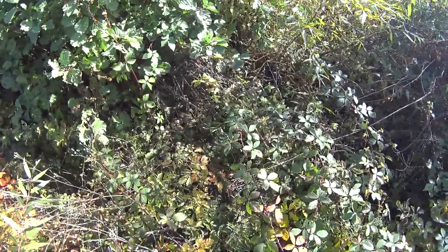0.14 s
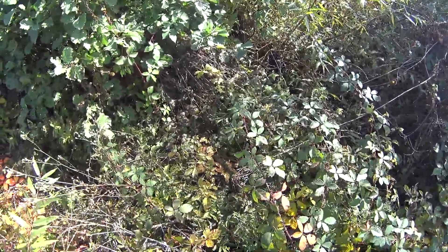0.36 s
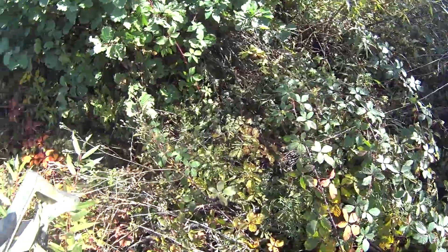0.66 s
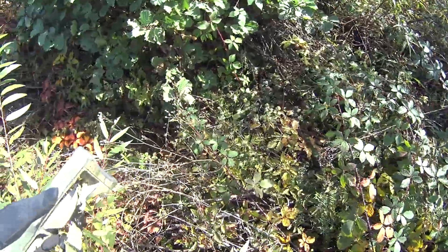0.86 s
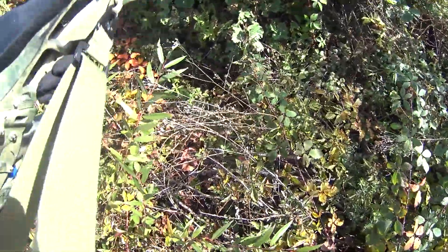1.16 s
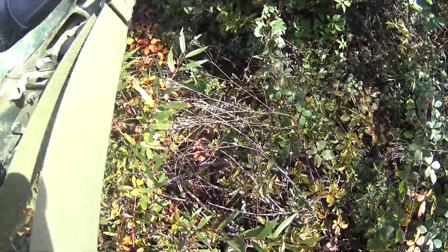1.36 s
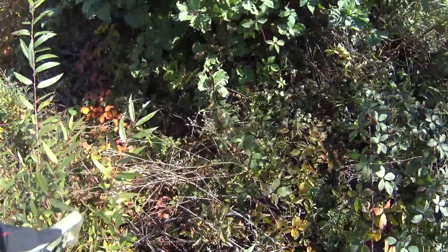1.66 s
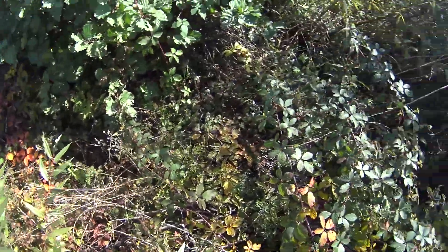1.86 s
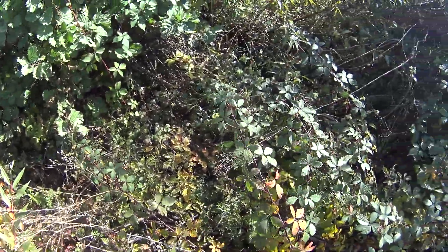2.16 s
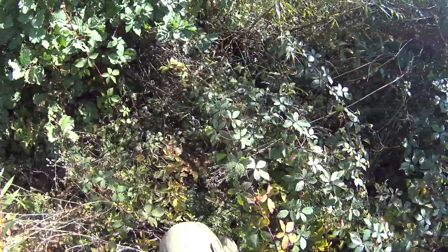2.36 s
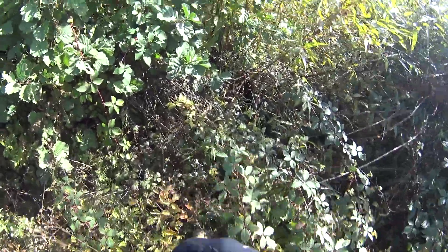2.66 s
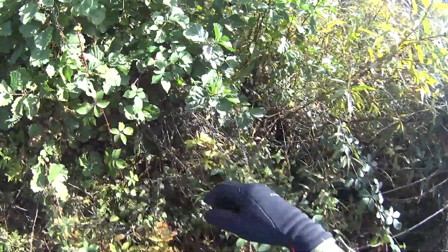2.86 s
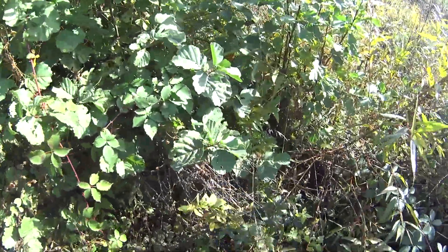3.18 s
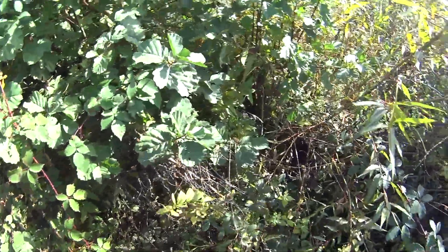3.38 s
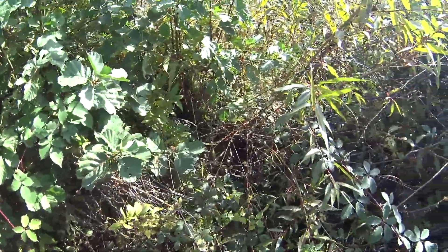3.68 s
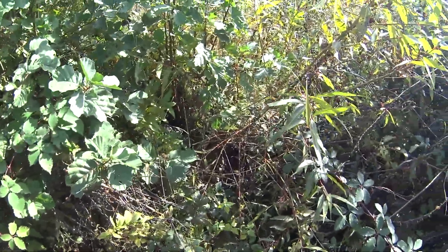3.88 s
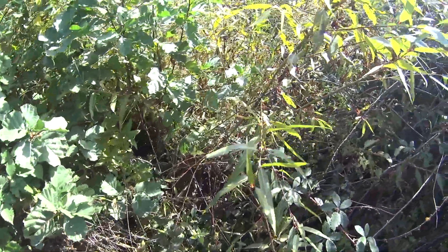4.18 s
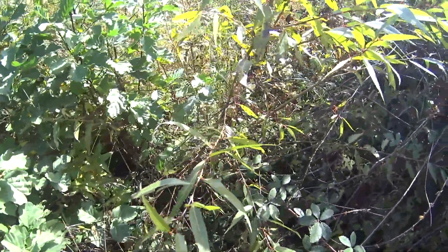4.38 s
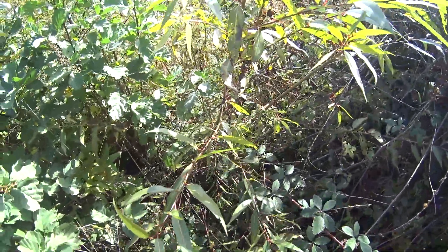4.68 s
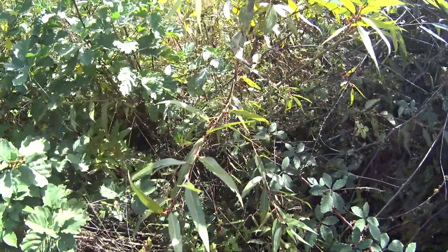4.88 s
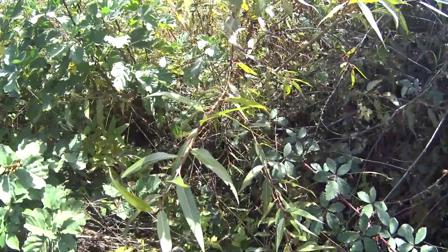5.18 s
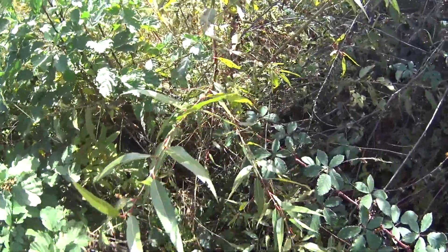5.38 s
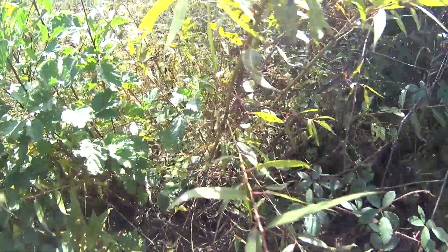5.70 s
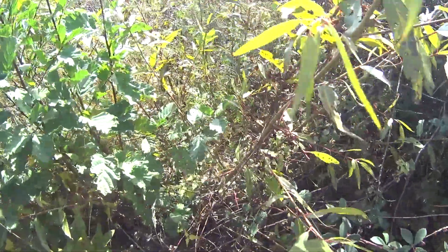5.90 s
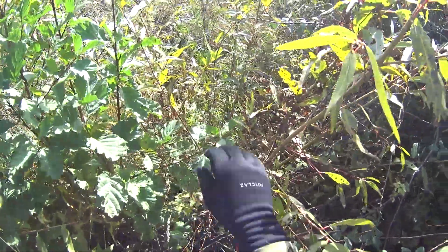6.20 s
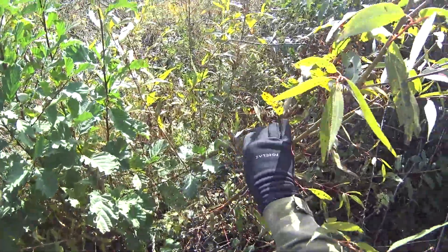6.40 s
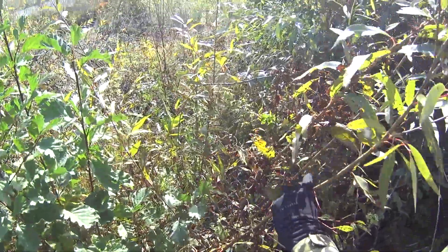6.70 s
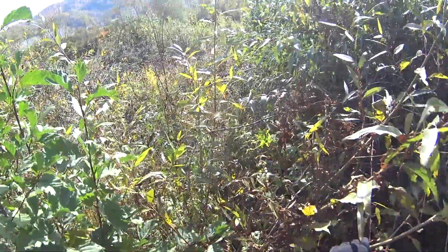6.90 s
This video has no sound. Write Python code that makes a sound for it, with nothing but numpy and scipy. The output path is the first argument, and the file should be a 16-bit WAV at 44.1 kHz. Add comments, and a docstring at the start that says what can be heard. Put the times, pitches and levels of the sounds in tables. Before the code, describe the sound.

Leaves rustle very close to the microphone as a person pushes through a thicket. The start is quiet, with fabric swishing, handling rumble and the odd dry crack. Two loud surges of crisp foliage and breaking twigs follow, with softer rustling between and after them. Stems drag and knock dully on the worn gear, over a faint hush of open air.

```python
"""Leaves swish and crackle close by as someone pushes through dense brush, wearing a small camera.
Each push sets off a crowd of tiny leaf contacts; dry twigs fracture, a bent stem creaks once,
and clothing slides with each reach. Gear and stems knock on the resonant camera mount, which also
rumbles as the body moves. Stems drag over the gear, and the open air hisses faintly behind it all."""
import sys
import numpy as np
from scipy import signal
from scipy.fft import rfft, irfft, next_fast_len
from scipy.io import wavfile
from scipy.ndimage import uniform_filter1d, map_coordinates

SR = 44100
rng = np.random.default_rng(int(sys.argv[2]) if len(sys.argv) > 2 else 0)


def inscribe(sig):
    """Save sig as 16-bit PCM at rate SR to the path in sys.argv[1].

    A 1-D sig is mono; a 2-D sig holds one channel per row.
    Samples are clipped to [-1, 1] before scaling.
    """
    pcm = np.round(np.clip(np.atleast_2d(sig).T, -1, 1) * 32767)
    wavfile.write(sys.argv[1], SR, pcm.astype(np.int16))


N = 310905


# Pushes into the foliage. Each row: time of full force in seconds, relative level in dB,
# build-up in seconds, hold in seconds.
LEAF_PUSHES = [(0.33, -55, 0.033, 0.018), (0.70, -51.5, 0.24, 0.064), (1.05, -45, 0.096, 0.014),
               (1.495, -40, 0.081, 0.011), (1.73, -49.5, 0.026, 0.018), (2.07, -41, 0.14, 0.064),
               (2.69, -36, 0.32, 0.018), (2.92, -23.5, 0.23, 0.14), (3.46, -40.5, 0.25, 0.0072),
               (3.585, -40, .04, 0.02), (3.68, -42, 0.086, 0.014), (3.98, -46, 0.022, 0.0091),
               (4.29, -43, 0.086, 0.24), (4.64, -38.5, 0.057, 0.059), (5.04, -35.5, 0.55, 0.02),
               (5.40, -24.5, 0.35, 0.11), (5.67, -26.5, 0.6, 0.038), (5.80, -40.5, 0.086, 0.074),
               (6.22, -48, 0.086, 0.018), (6.38, -38, 0.53, 0.17), (6.73, -40.5, .04, 0.013),
               (6.92, -36, 0.21, .13)]
# Spectrum of the rustle. Each row: frequency in Hz, relative level in dB.
LEAF_SPECTRUM = [(300, -20.5), (900, -26.5), (1800, -13.5), (2350, -8.5), (2770, -0.5), (3200, -4.5),
                 (5160, 1.5), (8200, -3), (9100, -13), (10100, -18), (11100, -12.5), (12200, -23),
                 (15100, -11), (16000, -24)]
# Nearer leaves sound crisper. Each row: time in seconds, top-octave gain in dB.
LEAF_CRISPNESS = [(1.2, 2), (2.2, 0.5), (3, 4), (4.24, -1), (4.29, 4.5), (5.5, 3), (6.3, 7), (7.05, 4)]

def leaves():
    """Superposed impulses: leaf edges flick over each other, louder and denser in a harder push."""
    push_db = effort(LEAF_PUSHES, release_s=0.22, rest_db=-55 + 2.1 * wobble(9))
    force_db = push_db + 35
    swish = grains(rate=9000 * amp(0.5 * force_db), spread_db=2)
    crinkle = amp(-4.5) * spurts(rate=90, decay_s=0.0018)
    crackle = amp(-9) * spurts(rate=23, decay_s=0.0014)  # dry leaves breaking
    # crinkles and crackles of single leaves sit in the swish, slightly stronger in a hard push
    share = amp(0.05 * force_db)
    mix = swish * amp(1.8 * wobble(35)) + share * (crinkle + crackle)
    rustle = coloured(mix / np.sqrt(1 + 0.5 * share ** 2), LEAF_SPECTRUM)
    top_octave = filtered(rustle, lambda hz: 1 - 1 / (1 + (hz / 9500) ** 10))
    return amp(push_db + 3.5) * (rustle + (amp(curve(LEAF_CRISPNESS)) - 1) * top_octave)


def spurts(rate, decay_s):
    """Shot noise: single leaves release bursts, rate a second, whose power decays exponentially."""
    t = np.arange(SR // 20) / SR
    energies = grains(rate, spread_db=5)[0] ** 2
    power = signal.fftconvolve(energies, np.exp(-t / decay_s))[:N]
    return unit(np.sqrt(np.abs(power)) * rng.standard_normal((2, N)))


# Breaking twigs. Each row: start in seconds, relative level in dB, centre frequency in Hz,
# tearing time constant in seconds.
TWIG_SNAPS = [(0.179, -25.5, 4680, 0.0028), (0.195, -23.5, 2570, 0.0044), (.779, -25, 3470, 0.0082),
              (.9338, -26.5, 2740, 0.0047), (1.0046, -31, 7140, 0.0059), (1.0458, -25, 2700, .008),
              (1.053, -11.5, 4500, 0.0037), (1.4877, -8.5, 5870, 0.0035), (2.156, -24, 5970, 0.0041),
              (2.3393, -22, 3850, 0.0026), (2.348, -27, 4830, 0.0015), (2.661, -16.5, 6940, 0.0047),
              (2.6796, -6, 3300, 0.0077), (2.689, -4.5, 2700, 0.0052), (2.706, -5, 3640, 0.01),
              (2.798, -8, 6800, 0.0013), (2.8281, -4, 5160, 0.003), (2.9035, -9.5, 5100, 0.0015),
              (2.919, -12, 6040, 0.0036), (2.9657, -7, 6130, 0.0041), (2.984, -12, 4000, 0.015),
              (3.014, -6, 5200, 0.0027), (3.059, -4.5, 5360, 0.0025), (3.085, -7, 8050, 0.0026),
              (3.46, -22, 5400, 0.0073), (3.5578, -23, 3940, 0.003), (3.6783, -17.5, 5200, 0.017),
              (3.7135, -13.5, 5740, 0.004), (3.868, -24.5, 6500, 0.0039), (3.9895, -18.5, 6050, 0.002),
              (4.6173, -18.5, 4960, 0.004), (4.657, -16.5, 6150, 0.0065), (4.678, -20, 7500, 0.0033),
              (5.0422, -17.5, 6000, .004), (5.474, -21, 6500, 0.0067), (5.509, -6.5, 7250, .003),
              (5.576, -4, 5100, 0.0017), (5.607, -6.5, 6700, 0.0038), (5.6277, -10, 5270, 0.0038),
              (5.6624, -7.5, 5370, 0.0065), (5.694, -11, 4730, .004), (5.71, -3.5, 5100, 0.001),
              (5.72, -8.5, 4830, 0.0026), (6.358, -20, 2740, 0.0056), (6.458, -8.5, 3060, 0.0019),
              (6.828, -17.5, 5200, 0.0028), (6.8636, -20, 3000, 0.0075)]
# Broad, bright spectrum of the snaps and creak, coloured by the microphone.
# Each row: frequency in Hz, relative level in dB.
SNAP_SPECTRUM = [(300, -18), (1400, -2.5), (2750, 1), (8200, -0.5), (9500, -13), (11000, -7),
                 (12200, -12.5), (15000, -7.5)]

def snaps():
    """Brittle fracture: a twig gives with an impulse, and its fibres go on tearing for a moment."""
    track, t = np.zeros((2, N)), np.arange(SR // 6) / SR
    for start, db, centre_hz, tear_s in TWIG_SNAPS:
        fibres = rng.standard_normal(len(t)) * np.exp(-t / tear_s)
        fibres[0] += 2.5  # the first break
        # thick twigs crack lower than thin ones
        size_db = lambda hz: -9 * np.log1p(np.log2((hz + 1) / centre_hz) ** 2)
        crack = filtered(fibres, lambda hz: causal(along(SNAP_SPECTRUM, hz) + size_db(hz)))
        burst_power = np.sum(crack ** 2) / (SR * (tear_s + 0.0015) / 2)
        add(track, start, amp(db - 6.5) * in_thicket(crack / np.sqrt(burst_power), wet_db=-7))
    return track


def creak(start=2.4345, length_s=0.025, slip_s=0.0045):
    """Stick-slip friction: a bent stem catches and lets go in a short, uneven run of dry ticks."""
    slips, t = np.zeros(SR // 6), np.arange(SR // 100) / SR
    for s in np.arange(0, length_s, slip_s):
        slip = unit(rng.standard_normal(len(t)) * np.exp(-t / 0.0008))
        add(slips, s + rng.normal(0, 0.0006), slip)
    ticks = filtered(slips, lambda hz: causal(along(SNAP_SPECTRUM, hz) - hz / 2500))
    track = np.zeros((2, N))
    add(track, start, amp(-14) * in_thicket(ticks / np.abs(ticks).max(), wet_db=-15))
    return track


# Blows on the mount. Each row: start in seconds, relative level in dB,
# natural frequency of the striking piece in Hz, contact cut-off in Hz.
MOUNT_BLOWS = [(0.494, -28, 466, 740), (0.7687, -11, 1120, 2030), (1.051, -21.5, 500, 1980),
               (1.159, -26, 510, 780), (1.828, -28, 515, 700), (2.33, -24.5, 796, 920),
               (2.871, -5.5, 1444, 2260), (2.989, -19, 1490, 2100), (3.121, -13, 405, 1410),
               (3.157, -21, 453, 1300), (3.194, -20, 950, 2060), (3.3613, -5, 887, 3500),
               (3.457, -25, 490, 1040), (3.764, -27, 1740, 2600), (3.81, -17, 1770, 2360),
               (4.5348, -14.5, 300, 1960), (5.38, -20, 900, 1960), (5.4856, -9.5, 315, 2220),
               (5.8357, -2.5, 937, 1720), (6.83, -21, 280, 1830)]

def knocks():
    """Impact excitation: a stem or buckle rattles on the mount for milliseconds; both ring briefly."""
    track, t = np.zeros((2, N)), np.arange(SR // 6) / SR
    for start, db, ring_hz, cutoff_hz in MOUNT_BLOWS:
        contact = rng.standard_normal(len(t)) * np.exp(-t / 0.0027) * (1 - np.exp(-t / 0.00017))
        softness = lambda hz: causal(-10 * np.log10(1 + (hz / cutoff_hz) ** 16))
        # a small, high-ringing piece hardly stirs the low modes of the mount
        force = lambda hz: softness(hz) * low_cut(hz, ring_hz / 2)
        mount_ring = filtered(contact, lambda hz: force(hz) * mount(hz))
        piece_ring = np.sin(2 * np.pi * ring_hz * t) * np.exp(-t / 0.0029) * (1 - np.exp(-t / 0.0031))
        clack = filtered(contact, force)
        blow = unit(mount_ring) + unit(piece_ring) + amp(-5.5) * unit(clack)
        add(track, start, amp(db - 23) * in_thicket(unit(blow), wet_db=-8))
    return panned(track, left_db=-2)


# Jolts of the body. Each row: time of full force in seconds, relative level in dB, hold in seconds.
BODY_JOLTS = [(0.031, -26, 0.0083), (0.34, -41, 0.0077), (0.498, -29.5, 0.0092), (0.563, -32, 0.017),
              (0.71, -24.5, 0.064), (0.895, -26, 0.1), (1.133, -33.5, 0.051), (1.313, -35, 0.032),
              (1.601, -28, 0.068), (1.717, -26, .06), (1.833, -31.5, .01), (2.356, -37, 0.0061),
              (2.502, -38, 0.14), (2.74, -38.5, .01), (2.861, -27, .02), (2.943, -30.5, 0.014),
              (3.051, -25, 0.028), (3.121, -12.5, 0.063), (3.244, -22.5, .02), (3.341, -21.5, 0.025),
              (3.463, -31, .01), (3.81, -38, .02), (4.876, -32.5, 0.045), (5.089, -29.5, .06),
              (5.22, -34, 0.017), (5.411, -31, 0.013), (5.56, -38.5, 0.032), (5.845, -28.5, 0.034),
              (6.035, -35.5, 0.034), (6.467, -37, 0.023)]
# Shaking between jolts. Each row: time in seconds, relative level in dB.
BODY_UNREST = [(0, -40), (1.3, -40.5), (1.98, -54), (2.3, -45.5), (2.9, -56), (3.55, -41.5), (3.95, -53),
               (4.1, -44), (4.47, -64), (4.75, -43), (5.3, -43), (6.15, -41), (6.6, -59), (7.05, -71)]

def rumble(rise_s=0.031):
    """Forced vibration: the moving body keeps the mount ringing; heavy jolts reach its deepest modes."""
    jolts = [(s, db, rise_s, hold_s) for s, db, hold_s in BODY_JOLTS]
    unrest_db = curve(BODY_UNREST) + 4.5 * wobble(25)  # the body never moves evenly
    jostle_db = effort(jolts, release_s=0.056, rest_db=unrest_db)
    padding = lambda hz: 1 / np.sqrt(1 + (hz / 380) ** 6)
    heavy = filtered(grains(rate=980, spread_db=1), lambda hz: mount(hz) * padding(hz))
    light = filtered(heavy, lambda hz: low_cut(hz, 50))
    weight = np.clip((jostle_db + 33) / 6.8, 0, 1)
    bounce, rock = weight * unit(heavy) + (1 - weight) * unit(light)
    # the ring keeps its strength for as long as the body drives it
    strength = np.sqrt(np.abs(uniform_filter1d(bounce ** 2, size=SR // 35)) + 0.1)
    shake = unit((bounce + 0.11 * np.array([rock, -rock])) / strength)
    return panned(amp(jostle_db - 2.5) * shake, left_db=-3.5)


# Resonances of the camera mount. Each row: frequency in Hz, bandwidth in Hz, relative gain in dB.
MOUNT_MODES = [(89.4, 10.8, -6), (150.3, 48, -10), (177.2, 11.5, 6), (270.2, 13.3, -14), (538, 220, -22.5),
               (690, 22, -17.5), (926, 47, -24), (1400, 73, -31), (1836, 270, -21.5)]

def mount(hz):
    """Modal superposition: the mount responds as a sum of damped resonators."""
    return sum(amp(db) * 1j * hz * width / (mode_hz ** 2 - hz ** 2 + 1j * hz * width)
               for mode_hz, width, db in MOUNT_MODES)


# Arm movements. Each row: time of full speed in seconds, relative level in dB,
# build-up in seconds, hold in seconds.
ARM_REACHES = [(0.0, -38.5, .2, 0.064), (0.34, -41, .3, .08), (1.20, -40.5, 0.54, 0.17),
               (1.72, -39, 0.57, 0.026), (1.96, -37, 0.71, 0.17), (2.50, -39, 0.18, .17),
               (3.04, -30, 0.076, 0.025), (3.42, -38.5, .1, .03), (3.73, -40, 0.16, .01),
               (4.40, -36.5, 0.43, 0.043), (4.65, -37, .08, 0.015), (4.88, -40, 0.25, 0.054),
               (5.38, -38, 0.13, 0.024), (5.76, -35, 0.14, 0.014), (6.36, -37.5, 0.65, .06),
               (6.92, -40.5, 0.95, 0.11)]
# Spectrum of sliding fabric. Each row: frequency in Hz, relative level in dB.
CLOTH_SPECTRUM = [(400, -19.5), (1400, -4.5), (2350, -3.5), (2800, 5.5), (3250, -1), (4650, -4),
                  (6300, -8.5), (9500, -30.5)]

def cloth():
    """Sliding friction: sleeves swish softly, and a stiff strap pulled past once adds a higher band."""
    slide_db = effort(ARM_REACHES, release_s=0.31, rest_db=-53)
    swish = coloured(grains(rate=9000, spread_db=2.5), CLOTH_SPECTRUM)
    strap_pull = np.sqrt(stroke(s=1.18, db=4.5, rise_s=0.065, hold_s=0.25, release_s=0.1))
    sheen = filtered(swish, lambda hz: np.exp(-((hz - 4900) / 1400) ** 2))
    return amp(slide_db - 0.97 + 0.24 * wobble(28)) * (swish + strap_pull * sheen)


# Stems dragged over the gear. Each row: time of full force in seconds, relative level in dB,
# build-up in seconds, hold in seconds.
STEM_DRAGS = [(1.98, -44.5, .5, .08), (2.70, -41, 0.33, .02), (3.12, -24.5, 0.18, 0.052),
              (3.33, -36.5, .1, 0.017), (4.42, -42.5, 0.13, 0.028), (4.65, -39.5, 0.066, .02),
              (5.39, -35, 0.066, 0.03), (5.85, -35, 0.37, 0.024), (6.42, -41.5, 0.37, 0.063),
              (7.03, -41.5, 0.2, .02)]
# Spectrum of the scrape. Each row: frequency in Hz, relative level in dB.
STEM_SPECTRUM = [(200, -18), (450, -1), (620, -7.5), (930, 0.5), (1170, -5.5), (1420, 1), (1620, -11),
                 (1900, 1.5), (2600, -44), (6000, -49)]

def stems():
    """Intermittent friction: stems drag over the gear in dull little slips that come in clumps."""
    # a restless body brushes more stems
    touch_db = 10 * np.log10(amp(-49) ** 2 + amp(curve(BODY_UNREST) - 6) ** 2)
    drag_db = effort(STEM_DRAGS, release_s=0.16, rest_db=touch_db)
    clumps = amp(3.2 * wobble(120))
    return amp(drag_db - 3.5) * coloured(clumps * grains(rate=2000, spread_db=1), STEM_SPECTRUM)


# Spectrum of the open air. Each row: frequency in Hz, relative level in dB.
AIR_SPECTRUM = [(15, -72), (25, -6), (120, -18), (180, 4), (317, -32), (962, -17), (2280, -52), (2840, -22),
                (6050, -36), (9840, -50), (16000, -34)]

def air():
    """Stationary noise: the faint, steady hush of the open air."""
    return amp(-58) * coloured(rng.standard_normal((2, N)), AIR_SPECTRUM)


# Echo of the thicket. Each row: frequency in Hz, time to fall by 60 dB in seconds.
THICKET_DECAY = [(200, 0.12), (2000, 0.055), (6000, 0.12), (14000, 0.057)]

def in_thicket(x, wet_db):
    """Scattering: the surrounding stems give a short sound a diffuse stereo tail."""
    hz, t, noise = signal.stft(rng.standard_normal((3, len(x))), SR, nperseg=256)
    decay = amp(-60 * t / along(THICKET_DECAY, hz)[:, None])
    tails = signal.istft(noise * decay, SR, nperseg=256)[1]
    tail = tails[0] + 0.49 * tails[1:]  # a common part plus one for each side
    scatter = signal.fftconvolve(x[None], tail / np.linalg.norm(tail[0]), axes=1)
    return x + amp(wet_db) * scatter[:, :len(x)]


# Likeness of left and right. Each row: frequency in Hz, correlation from 0 to 1.
MIC_COHERENCE = [(100, 1), (500, 0.66), (2000, 0.9), (5000, 0.91), (9000, 1)]

def coloured(pair, spectrum):
    """Partial coherence: two unrelated signals take a spectrum and blend as at two close microphones."""
    def response(hz):
        turn = np.arccos(np.clip(along(MIC_COHERENCE, hz), -1, 1)) / 2
        return causal(along(spectrum, hz)) * np.array([np.cos(turn), np.sin(turn)])
    mid, side = filtered(pair, response)
    return unit(np.array([mid + side, mid - side]))


def grains(rate, spread_db):
    """Random impulse process: two trains of clicks of log-normal size, rate a second, at rms 1."""
    chance = np.clip(rate / SR, 1e-4, 1)
    signs = rng.choice([-1, 1], (2, N))
    sizes = amp(spread_db * np.clip(rng.standard_normal((2, N)), -2, 2))
    return unit(signs * sizes * (rng.random((2, N)) < chance) / np.sqrt(chance))


def stroke(s, db, rise_s, hold_s, release_s):
    """Exponential envelope: a movement's power rises, holds and falls, 20 dB per rise or release time."""
    t = np.arange(N) / SR - s
    below = np.maximum(-t / rise_s, (t - hold_s) / release_s)
    return amp(db - 20 * np.clip(below, 0, 10)) ** 2


def effort(strokes, release_s, rest_db):
    """Incoherent addition: overlapping movements and a resting level sum in power, given in dB."""
    return 10 * np.log10(amp(rest_db) ** 2 + sum(stroke(*row, release_s) for row in strokes))


def filtered(x, response):
    """Convolution theorem: the spectrum of x is multiplied by a frequency response."""
    n = x.shape[-1]
    size = next_fast_len(n + 8192)
    return irfft(rfft(x, size) * response(np.fft.rfftfreq(size, 1 / SR)), size)[..., :n]


def causal(db):
    """Minimum phase: a response for a dB curve on the FFT grid, with no sound before its cause."""
    cepstrum = irfft(np.log(np.maximum(amp(db), 1e-6)))
    half = len(cepstrum) // 2
    cepstrum[1:half] *= 2
    cepstrum[half + 1:] = 0
    return np.exp(rfft(cepstrum))


def low_cut(hz, corner_hz):
    """Second-order high-pass response."""
    return (1j * hz / (1j * hz + corner_hz)) ** 2


def amp(db):
    """Decibels to gain."""
    return 10 ** (np.asarray(db) / 20)


def unit(x):
    """Normalisation to rms 1."""
    return x / np.sqrt(np.mean(x ** 2) + 1e-20)


def along(points, hz):
    """Interpolation of (Hz, value) points on a log axis."""
    freqs, values = np.transpose(points)
    return np.interp(np.log(hz + 1), np.log(freqs + 1), values)


def curve(rows):
    """Interpolation of (seconds, value) rows at every sample."""
    return np.interp(np.arange(N) / SR, *np.transpose(rows))


def wobble(rate):
    """Random modulation: a smooth curve with rate knots a second."""
    return map_coordinates(rng.standard_normal(int(N * rate / SR) + 4), [np.arange(N) * rate / SR])


def add(track, s, sound):
    """Superposition of a sound on a track at s seconds."""
    part = track[..., max(round(s * SR), 0):][..., :sound.shape[-1]]
    part += sound[..., :part.shape[-1]]


def panned(x, left_db):
    """Level difference between the ears: left exceeds right by left_db."""
    half_db = np.atleast_1d(left_db) / 2
    return x * amp([half_db, -half_db])


# Sway of the nearby sounds. Each row: time in seconds, left minus right level in dB.
STEREO_SWAY = [(0, 1.5), (1.3, 2), (2.2, 0.5), (2.9, 0.3), (3.6, 1.5), (5.5, 0.25), (7.05, 0)]

def scene():
    """Superposition: nearby brush and clothing, sound carried through the mount, and the open air."""
    near = panned(leaves() + snaps() + creak() + cloth(), curve(STEREO_SWAY))
    return near + stems() + rumble() + knocks() + air()


def record(dry, ceiling=0.8, top_hz=16100):
    """Saturation and band limiting: the camera rounds off high peaks and keeps nothing above top_hz."""
    limited = dry / (1 + (dry / ceiling) ** 6) ** (1 / 6)
    return filtered(limited, lambda hz: hz < top_hz)


dry = scene()
out = record(dry)
inscribe(out)
```